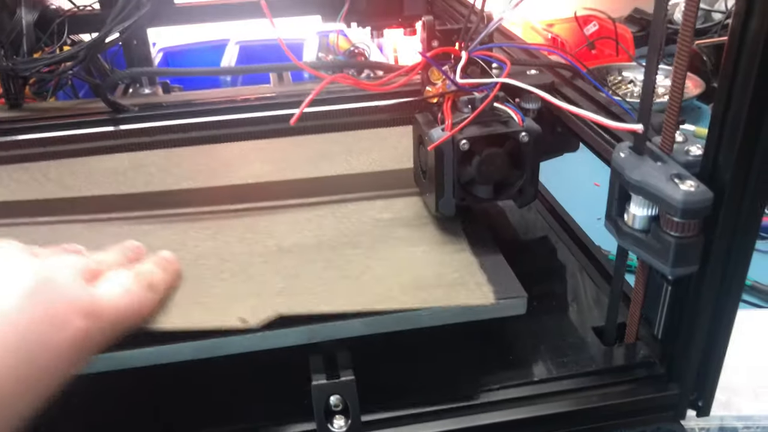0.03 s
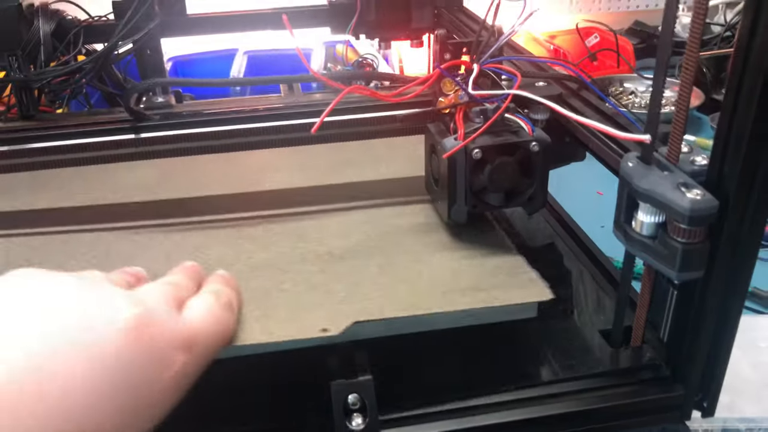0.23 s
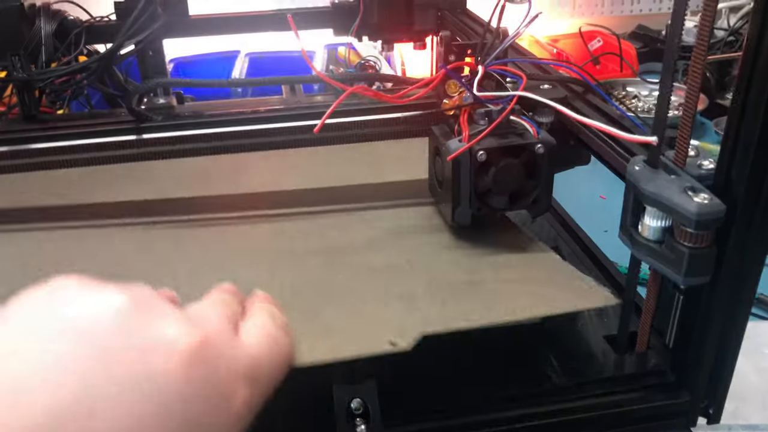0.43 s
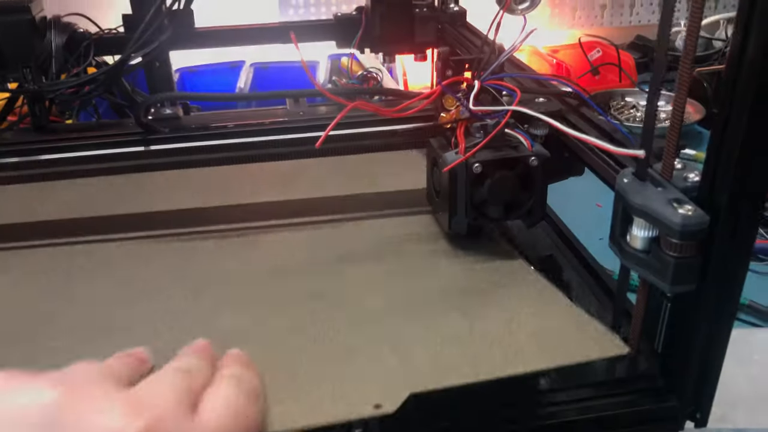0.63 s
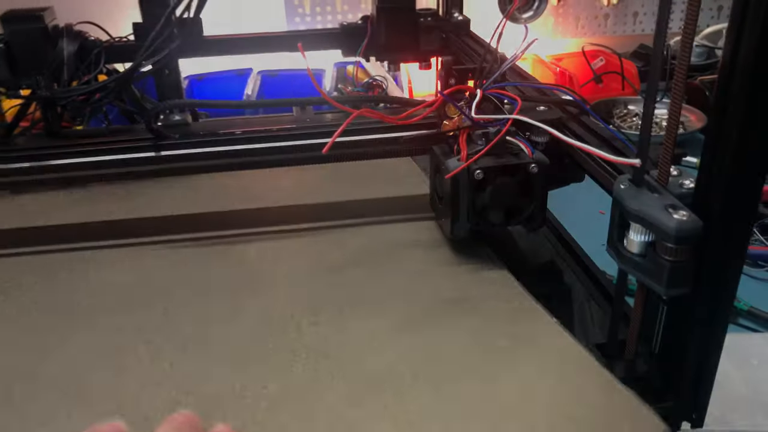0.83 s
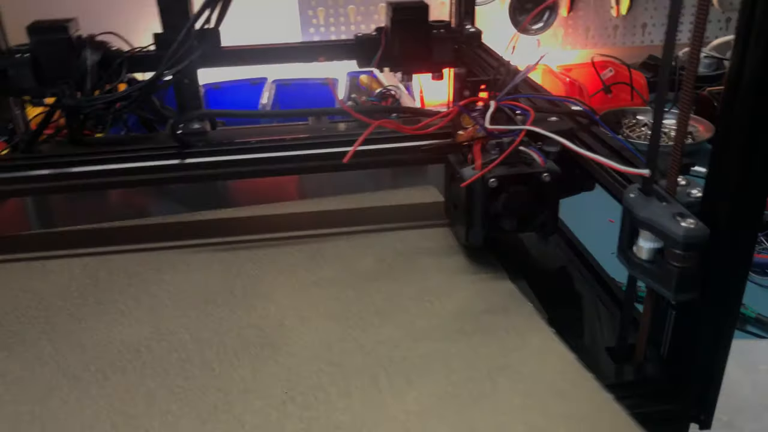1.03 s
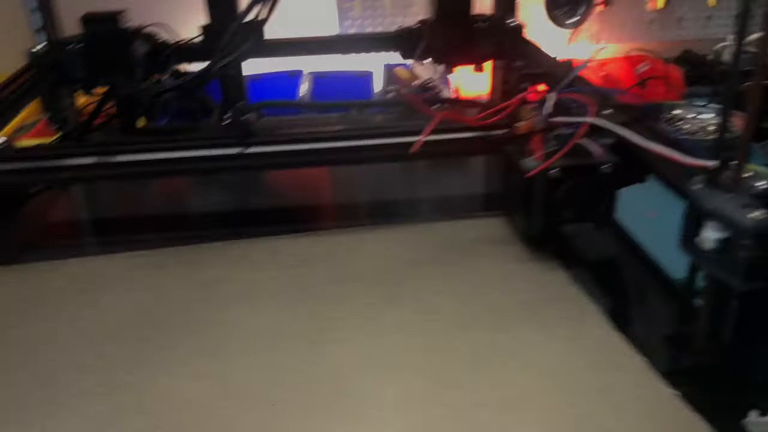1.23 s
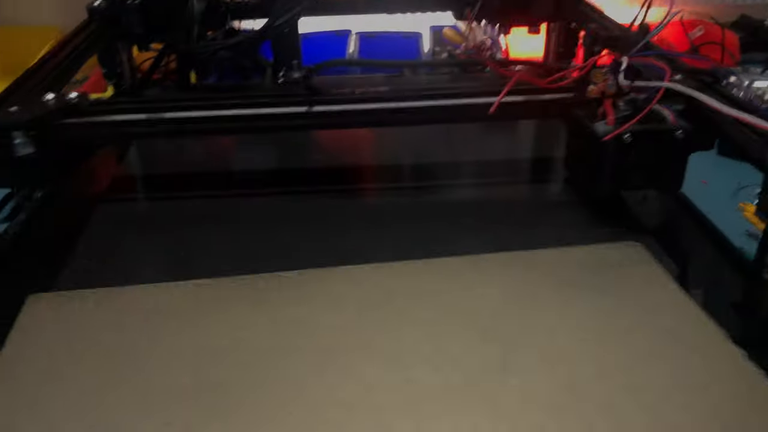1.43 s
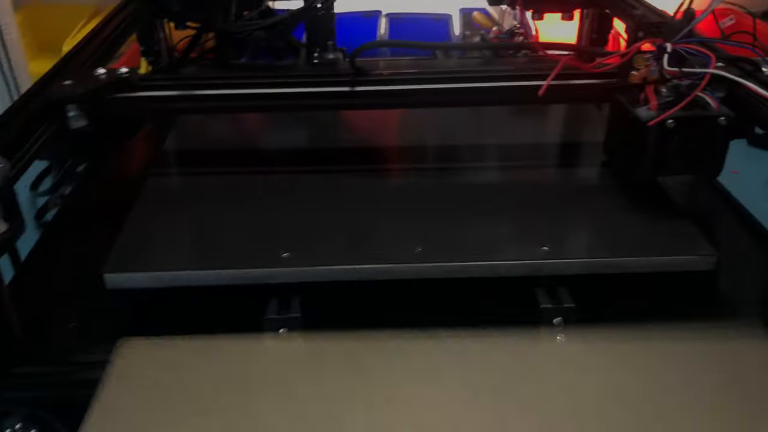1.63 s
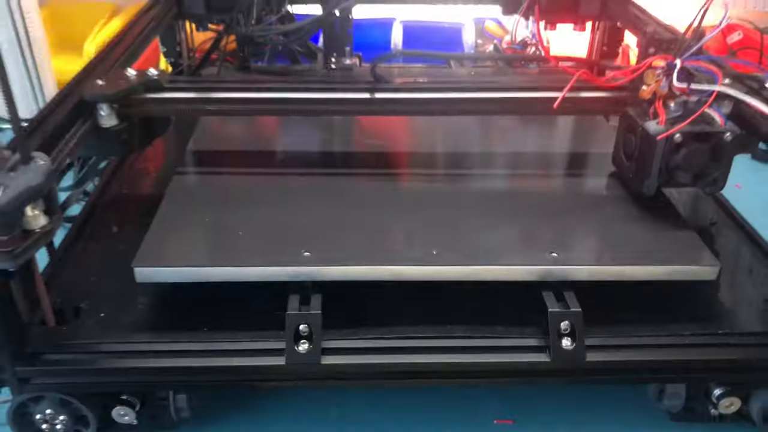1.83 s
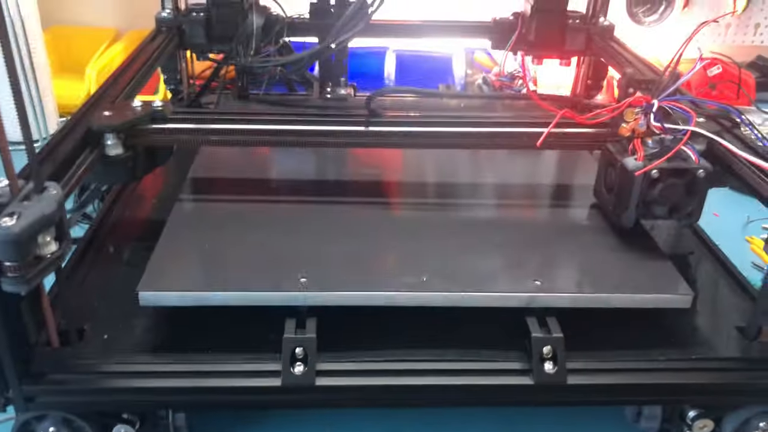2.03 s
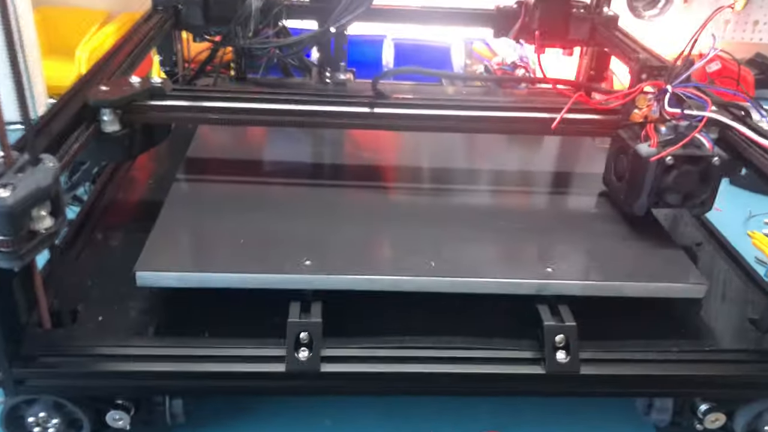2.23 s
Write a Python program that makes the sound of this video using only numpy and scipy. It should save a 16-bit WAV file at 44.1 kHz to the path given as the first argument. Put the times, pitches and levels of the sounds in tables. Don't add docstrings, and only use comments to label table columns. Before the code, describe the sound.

A thin flexible steel sheet is dragged by hand over a printer bed in quiet gritty strokes with small knocks, then peels away with a loud whoop, snap and fading wobble, close in a small room.

```python
import sys
import numpy as np
from scipy import signal
from scipy.fft import rfft, irfft
from scipy.io import wavfile
from scipy.ndimage import uniform_filter1d

SR = 44100
rng = np.random.default_rng(int(sys.argv[2]) if len(sys.argv) > 2 else 0)


def ratio_of_db(decibels):
    return 10 ** (np.asarray(decibels, float) / 20)


def to_wav(s):
    ch = np.atleast_2d(s).T
    pcm = np.round(np.clip(ch, -1, 1) * 32767)
    wavfile.write(sys.argv[1], SR, pcm.astype(np.int16))


N = 101297
SILENT_DB = -200


def seconds():
    return np.arange(N) / SR


def unit(x):
    return x / np.sqrt(np.mean(x ** 2))


def curve(table, column, outside=None):
    rows = np.array(table, float)
    return np.interp(seconds(), rows[:, 0], rows[:, column], left=outside, right=outside)


def band(x, hz, width):
    return signal.lfilter(*signal.iirpeak(min(hz, SR / 2.2), hz / width, fs=SR), x)


def double_band(x, hz, width):
    return band(band(x, hz, width), hz, width)


def colour(x, table):
    rows = np.array(table, float)
    f = np.arange(N // 2 + 1) * SR / N + 1
    level_db = np.interp(np.log(f), np.log(rows[:, 0]), rows[:, 1])
    return unit(irfft(rfft(x) * ratio_of_db(level_db), N))


def clicks(per_s, spread_db):
    chance = rng.random((3, N))
    happens = chance[0] < per_s / SR
    size = ratio_of_db(-spread_db * np.log(1 - chance[2]))
    return happens * np.sign(chance[1] - .5) * size


def walk(rate):
    k = int(SR / rate)
    steps = np.repeat(rng.standard_normal(N // k + 1), k)
    smooth = uniform_filter1d(uniform_filter1d(steps, k), k)
    return unit(smooth[:N])


def add_wave(out, s, gain, hz, length, end_hz=None, attack=0.73, turn=0.):
    i = int(s * SR)
    u = np.arange(int(length * SR)) / (length * SR)
    shape = np.sin(np.pi * u ** (np.log(.5) / np.log(np.clip(attack, .05, .9))))
    glide = (end_hz or hz) - hz
    cycles = turn + length * (hz * u + glide * u ** 2 / 2)
    wave = gain * shape * np.sin(2 * np.pi * cycles)
    out[i:i + len(u)] += wave[:max(N - i, 0)]


# peak in seconds,
# level in dB, rise in seconds, fall in seconds, brightness in dB.
HAND_STROKES = [(.0, -35, .01, 0.0068, -0.5), (.2, -55, 0.15, 0.6, -1.5), (0.411, -50, 0.042, 0.093, 2.5),
                (0.559, -41.5, 0.047, 0.08, -1.5), (0.762, -49.5, 0.073, 0.06, 5),
                (0.962, -45.5, 0.095, 0.12, 3.5), (1.184, -43.5, 0.051, 0.064, 4.5),
                (1.41, -42, 0.12, 0.096, 1), (1.62, -44.5, 0.042, 0.083, -6),
                (1.71, -41, 0.037, 0.088, -0.5), (1.91, -53, 0.046, 1, -2.5)]
# pitch in Hz, level in dB per Hz.
GRIT_COLOUR = [(500, 0.5), (1100, -1.5), (2300, -1), (3100, -2.5), (4500, 0), (6800, -3), (7800, -8.5),
               (16000, -17.5)]


def rubbing():
    t = seconds()
    chirps = np.zeros(N)
    for when, pitch, glide, size in rng.random((221, 4)):
        hz = 2300 * 2 ** (1.5 * pitch)
        end_hz = hz * (1 + .08 * (glide - .5))
        add_wave(chirps, 1.7 * when, 1, hz, 0.011 * (.5 + 1.5 * size), end_hz)
    hiss = colour(clicks(per_s=6700, spread_db=-1), GRIT_COLOUR)
    hiss = hiss * ratio_of_db(walk(41.73)) + ratio_of_db(-6.5) * chirps
    dull = signal.sosfilt(signal.butter(2, 3300, fs=SR, output="sos"), hiss)
    bright = hiss - dull
    out = np.zeros(N)
    for s, db, rise, fall, tilt_db in HAND_STROKES:
        swell = np.exp(-((t - s) / np.where(t < s, rise, fall)) ** 2)
        out += ratio_of_db(db) * swell * (ratio_of_db(-tilt_db) * dull + ratio_of_db(tilt_db) * bright)
    return out


# pitch in Hz, width in Hz, level in dB.
FRAME_RINGS = [(333.4, 7.7, -1), (1090, 60, -2.5), (1420, 190, -9.5), (2387, 44, -10.5), (2660, 21, -17)]
# time in seconds, judder of the frame in dB, weight on the bed in dB.
DRAG_LEVELS = [(0, -39.5, -47.5), (.08, -66, -48.5), (.18, -88, -67), (.23, -55, -63), (.28, -59, -68),
               (.32, -51.5, -52.5), (.5, -61, -52), (.68, -40, -50), (.74, -47, -50), (.8, -59, -93),
               (1.38, -53, -82), (1.44, -45, -79), (1.52, -44, -68), (1.585, -52, -63)]


def frame_and_bed():
    judder = clicks(per_s=1500, spread_db=2) * ratio_of_db(.8 * walk(25))
    shaken = ratio_of_db(0) * double_band(judder, 220, 560) / np.sqrt(250)
    for hz, width, db in FRAME_RINGS:
        shaken = shaken + ratio_of_db(db) * band(judder, hz, width) / np.sqrt(width)
    bed = unit(double_band(judder, 125, 170))
    frame_gain = ratio_of_db(curve(DRAG_LEVELS, 1, SILENT_DB))
    bed_gain = ratio_of_db(curve(DRAG_LEVELS, 2, SILENT_DB))
    return unit(shaken) * frame_gain + bed * bed_gain


# pitch in Hz, level in dB per Hz.
ROOM_COLOUR = [(15, -19), (25, -35), (94, -11), (293, -3), (489, 2.5), (1230, 10), (1500, -6), (2280, -38),
               (16000, -8)]
# pitch in Hz, width in Hz, level in dB.
FAN_BANDS = [(1460, 60, -1), (1750, 50, -6), (2800, 70, -14), (3580, 70, -9), (4100, 60, -13),
             (4620, 40, -14), (5480, 60, -14)]


def workshop():
    noise = rng.standard_normal((3, N))
    room = colour(noise[0], ROOM_COLOUR)
    hum = unit(double_band(noise[1], 63, 22))
    fan = unit(sum(ratio_of_db(db) * double_band(noise[2], hz, 5 * width) for hz, width, db in FAN_BANDS))
    fan_shift_db = np.interp(seconds(), (2.2, 1.905), [-12.5, 0])
    return ratio_of_db(-59.5) * room + ratio_of_db(-60) * hum + ratio_of_db(-52.5 + fan_shift_db) * fan


# start in seconds, peak in dB, pitch in Hz, time to fade by 60 dB in seconds,
# brightness in dB.
SHARP_TICKS = [(.0014, -36, 1950, 0.13, 2.5), (0.1532, -34.5, 5460, 0.0098, 10.5),
               (.2694, -52, 5950, .02, 13), (1.6038, -43.5, 2300, .05, 6), (1.6423, -19.5, 4040, 0.01, -28),
               (1.658, -22, 4600, 0.037, -2.5), (1.66, -22.5, 5100, 0.046, 2),
               (1.6651, -17, 2400, 0.069, -10), (1.6787, -31, 5960, 0.031, -4),
               (1.6856, -26.5, 4500, 0.028, 6.5), (1.7068, -31, 2410, 0.043, 13.5),
               (1.7105, -26, 4100, 0.083, 5.5), (1.7477, -34.5, 3950, 0.03, 10),
               (1.7704, -27, 3300, 0.027, 1), (1.7983, -32.5, 2900, 0.028, -4),
               (1.8155, -34, 2820, 0.026, -2), (1.879, -55, 9400, 0.51, 6)]


def ticks():
    out, t = np.zeros(N), np.arange(4000) / SR
    for s, db, hz, t60, top_db in SHARP_TICKS:
        i = int(s * SR)
        burst = rng.standard_normal(4000) * ratio_of_db(-60 * t / max(t60, .003))
        burst[0] = 1.8
        top = band(burst, 8120, 8500)
        ring = band(band(burst, hz, hz / 1.9), hz, hz) * 2
        out[i:i + 4000] += ratio_of_db(db - 11) * (ratio_of_db(top_db) * top + ratio_of_db(7) * ring)
    return out


# start in seconds, peak in dB, pitch in
# Hz, ring in seconds.
EDGE_KNOCKS = [(.002, -50, 877, 0.028), (0.013, -45, 230, 0.021), (0.041, -33.5, 118, 0.0086),
               (0.056, -37, 96, 0.024), (0.213, -40.5, 1445, 0.013), (0.367, -37.5, 1480, 0.011),
               (.405, -38.5, 2400, 0.0069), (0.517, -37, 182.4, 0.015), (0.555, -36.5, 106.7, 0.04),
               (.555, -38, 2340, 0.015), (0.652, -39.5, 2900, 0.007), (0.993, -42.5, 1730, 0.013),
               (0.992, -39, 3204, 0.011), (1.058, -36, 262, 0.0061), (1.085, -37.5, 275, 0.017),
               (1.102, -35, 196, 0.015), (1.413, -51, 347, 0.016), (1.46, -41, 1250, 0.033),
               (1.491, -35.5, 1250, 0.014), (1.538, -42, 1050, 0.028), (1.641, -23, 1074, 0.0042),
               (.01, -40.5, 630, 0.021), (.012, -45, 982, 0.022), (0.104, -46, 80, 0.11),
               (.205, -48, 580, 0.028), (.213, -48.5, 976, 0.018), (0.373, -42, 1045, 0.023),
               (0.554, -46, 1090, 0.058), (.933, -52, 4350, 0.015), (.957, -46, 5750, 0.022),
               (0.975, -44, 5700, 0.019), (1.437, -42, 6500, .01), (1.854, -18.5, 262, .013),
               (2.085, -42, 350, 0.032)]


def knocks():
    out, t = np.zeros(N), np.arange(4000) / SR
    for s, db, hz, ring in EDGE_KNOCKS:
        i = int(s * SR)
        add_wave(out, s, ratio_of_db(db), hz, ring, attack=.45)
        scuff = rng.standard_normal(4000) * ratio_of_db(-60 * t / .06)
        scuff = band(band(scuff, hz, 2 * hz), hz, 3 * hz)
        out[i:i + 4000] += ratio_of_db(db + 3) * scuff * np.minimum(t / 0.00061, 1)
    return out


# time in seconds, pitch in Hz, level in dB.
SQUEAK_PATH = [
    (1.4, 5250, -56),
    (1.42, 5450, -50),
    (1.445, 5150, -51),
    (1.475, 4600, -51),
    (1.495, 4000, -53),
]


def squeak():
    hz = curve(SQUEAK_PATH, 1) * (1 + .006 * walk(150))
    tone = np.sin(2 * np.pi * np.cumsum(hz) / SR)
    level_db = curve(SQUEAK_PATH, 2, SILENT_DB) + 4 + 2.2 * walk(60)
    return tone * uniform_filter1d(ratio_of_db(level_db), size=300)


WHOOP_S, WHOOP_LENGTH_S = 1.6648, .0162
# time in seconds, level in dB, lowest pitch in Hz, highest in Hz.
WOBBLE_PATH = [
    (1.592, -46, 308, 900),
    (1.62, -44, 300, 1000),
    (1.662, -36, 252, 1300),
    (1.686, -27, 420, 1150),
    (1.715, -33, 330, 1140),
    (1.745, -36, 200, 1150),
    (1.87, -37, 170, 900),
    (1.97, -43, 200, 720),
    (2.19, -57, 230, 540),
]


def wobble():
    t, waves, per_s = seconds(), np.zeros(N), 500
    low, high = curve(WOBBLE_PATH, 2), curve(WOBBLE_PATH, 3)
    for k, (a, c) in enumerate(rng.standard_normal((300, 2))):
        i = int((WOBBLE_PATH[0][0] + (k + a) / per_s) * SR)
        place = k * (np.sqrt(5) - 1) / 2 % 1
        hz = low[i] * (high[i] / low[i]) ** place
        gain = ratio_of_db(1.5 * c - 1.5 * place)
        add_wave(waves, i / SR, gain, hz, 5.1 / hz, hz * (1 + 0.14 * c), turn=a)
    even = waves / np.sqrt(uniform_filter1d(waves ** 2, size=2500) + 1e-3)
    from_whoop = (t - WHOOP_S - WHOOP_LENGTH_S / 2) / WHOOP_LENGTH_S
    hush = 1 - .7 * np.exp(-(from_whoop * 1.3) ** 4)
    return even * ratio_of_db(1.2 * walk(60)) * hush * ratio_of_db(curve(WOBBLE_PATH, 1, SILENT_DB))


# start in seconds, peak in dB, pitch in Hz,
# length in seconds.
SINGLE_BENDS = [(1.594, -31.5, 424, 0.0083), (1.598, -35.5, 1125, 0.034), (1.606, -34, 424, 0.016),
                (1.625, -28.5, 490, 0.007), (1.637, -27.0, 395, 0.014), (1.65, -18, 323, 0.0078),
                (1.678, -17, 652, 0.028), (1.683, -21, 810, 0.0096), (1.688, -12.5, 580, 0.0086),
                (1.699, -21, 1080, 0.012), (1.7, -19, 541.0, 0.011), (1.704, -32, 901, 0.05),
                (1.71, -21, 1027, 0.0088), (1.713, -18, 460, 0.0084), (1.717, -33, 474, 0.034),
                (1.725, -27.5, 347, 0.042), (1.729, -54, 644.0, 0.036), (1.745, -29.5, 250, 0.016),
                (1.751, -33.5, 541.0, 0.056), (1.77, -21.5, 362, 0.019), (1.775, -27.5, 191.0, 0.015),
                (1.788, -28.5, 387, 0.05), (1.795, -20.5, 618, 0.0061), (1.797, -29, 557, 0.018),
                (1.809, -37, 160, 0.0075), (1.825, -19, 137, 0.014), (1.827, -30.5, 515, 0.043),
                (1.836, -24, 417.0, 0.015), (1.84, -19.5, 256.6, 0.039), (1.843, -27.0, 133, 0.028),
                (1.85, -29, 302, 0.021), (1.876, -45, 204, 0.037), (1.879, -27.5, 257.4, 0.041),
                (1.884, -30.5, 565.0, 0.018), (1.894, -26, 118.0, 0.029), (1.897, -46, 370, 0.013),
                (1.903, -35, 372, 0.02), (1.923, -39, 141.0, 0.04), (1.924, -26, 617, 0.0072),
                (1.931, -37, 337, 0.048), (1.947, -30.5, 265, 0.02), (1.954, -33.5, 433, 0.037),
                (1.959, -32.0, 333, 0.038), (1.979, -38.0, 180, 0.043), (2.005, -48, 222, 0.047),
                (2.006, -39, 340, 0.032), (2.037, -37.5, 351.0, 0.034), (2.066, -43.5, 333, 0.014)]


def bends():
    out = np.zeros(N)
    for (s, db, hz, length), (turn, sag) in zip(SINGLE_BENDS, rng.random((len(SINGLE_BENDS), 2))):
        add_wave(out, s, ratio_of_db(db), hz, length, hz * (1 + .06 * (sag - .5)), attack=.45, turn=turn)
    return out


def crackle():
    pops = unit(band(clicks(per_s=1800, spread_db=3.5), 3400, 5000))
    swell = np.interp(seconds(), (1.655, 1.68, 1.729, 1.8), [0, 1, 1, 0])
    return ratio_of_db(-40) * pops * swell ** 2


SWING_TIMES = (1.658, 1.687, 1.76, 1.86, 1.97)


def boom():
    rumble = band(band(rng.standard_normal(N), 73, 160), 73, 150)
    return ratio_of_db(-30.5) * unit(rumble) * np.interp(seconds(), SWING_TIMES, [0.023, 0.92, 0.24, 0.94, 0.04])


def whoop_and_snap():
    out = np.zeros(N)
    add_wave(out, WHOOP_S, ratio_of_db(-4.8), 325, WHOOP_LENGTH_S, end_hz=630, attack=.45, turn=.25)
    add_wave(out, 1.6797, ratio_of_db(-1.5), 800, .0038, attack=.5, turn=.06)
    return out


def scene():
    rubbed = rubbing() + frame_and_bed() + ticks() + knocks() + squeak()
    near = rubbed + wobble() + bends() + crackle() + boom() + whoop_and_snap()
    t = np.arange(SR // 2) / SR
    echo = band(rng.standard_normal(len(t)), 3070 / 3, 3070)
    echo = echo * ratio_of_db(-60 * t / 0.3) * (t > .004)
    wet = signal.fftconvolve(near, echo / np.sqrt(np.sum(echo ** 2)))[:N]
    return (near + ratio_of_db(-15.5) * wet + workshop())[None]


def low_pass(x):
    return signal.sosfilt(signal.butter(12, 16970, fs=SR, output="sos"), x)


def record(dry):
    sound = signal.sosfilt(signal.butter(2, 42, "high", fs=SR, output="sos"), dry)
    sound = sound - .45 * band(sound, 10400, 500)
    sound = signal.sosfilt(signal.ellip(10, .2, 36, 15800, fs=SR, output="sos"), sound)
    return low_pass(sound)


dry = scene()
out = record(dry)
to_wav(out)
```